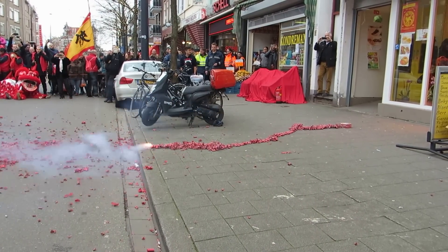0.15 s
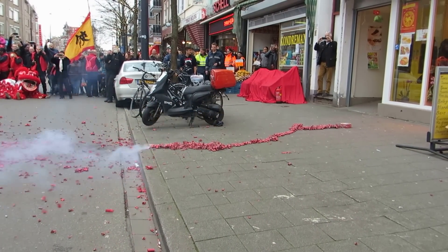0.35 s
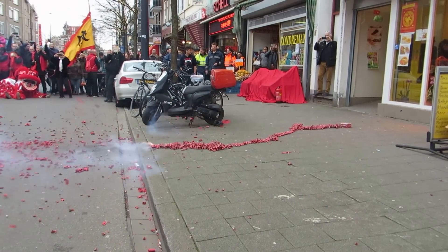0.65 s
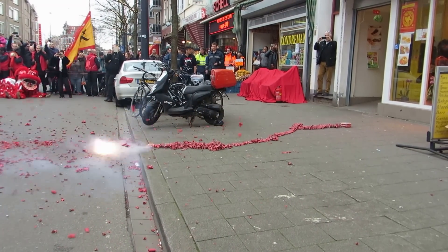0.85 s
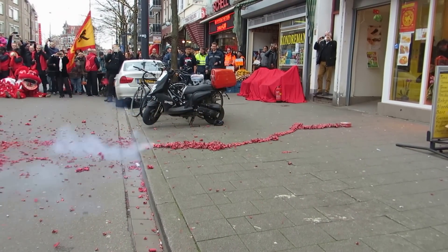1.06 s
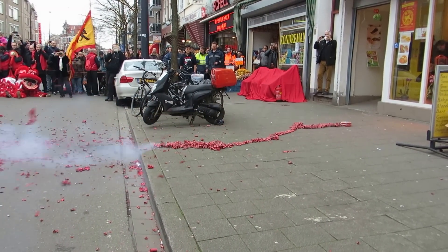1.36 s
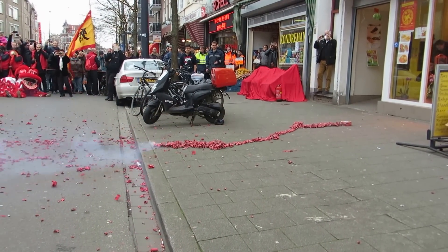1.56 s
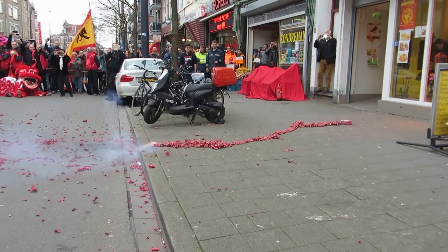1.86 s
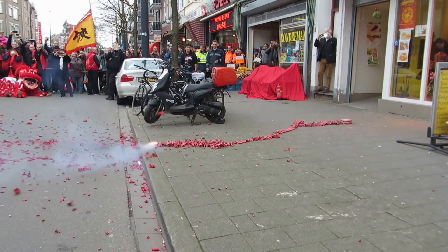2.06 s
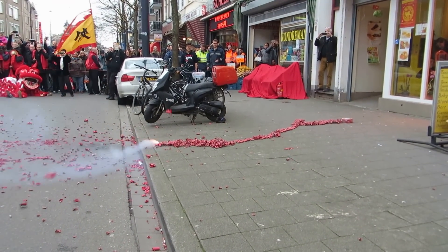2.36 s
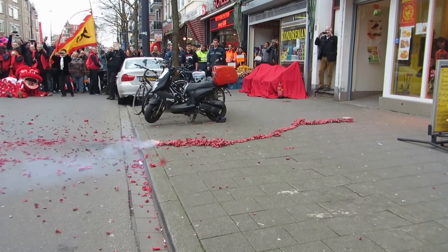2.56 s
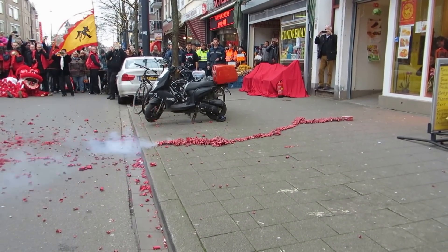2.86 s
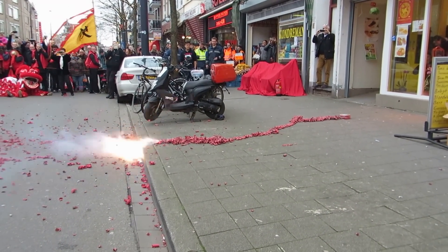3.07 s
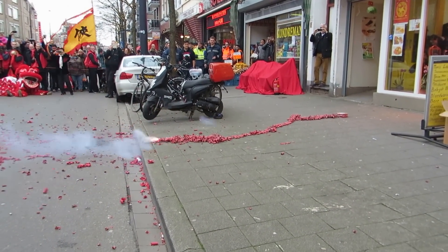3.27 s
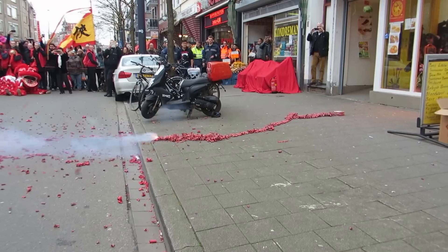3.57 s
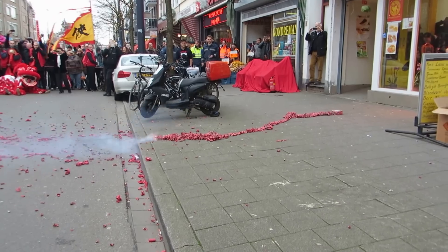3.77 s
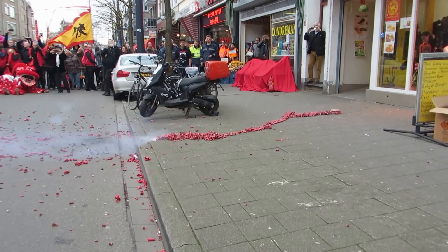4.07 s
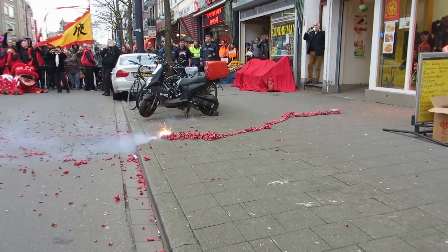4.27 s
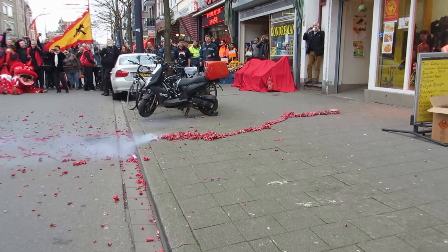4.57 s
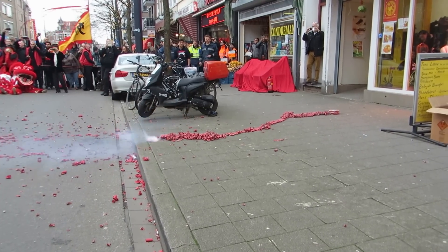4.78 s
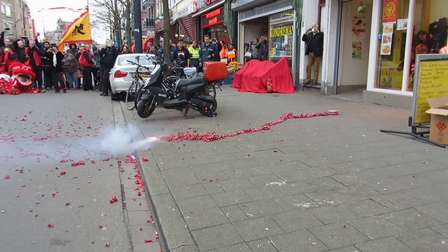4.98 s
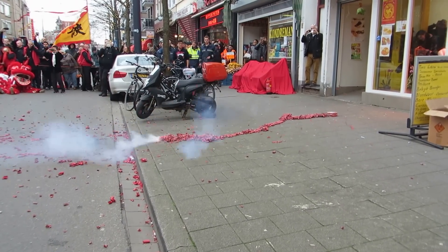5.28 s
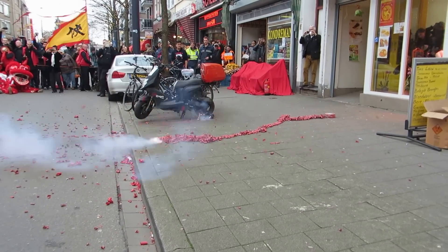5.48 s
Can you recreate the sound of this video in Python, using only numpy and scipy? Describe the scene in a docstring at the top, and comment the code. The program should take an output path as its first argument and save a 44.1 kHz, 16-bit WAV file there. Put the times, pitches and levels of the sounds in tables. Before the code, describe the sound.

Firecrackers go off close by in uneven clusters of harsh, distorted blasts that echo along a city street.

```python
"""Firecrackers on a city pavement, a few steps from a camera's stereo microphone.
An echo is already dying between the house fronts when the first cluster goes off. Each blast overloads
the microphone: a sharp crack, then a flat-topped roar that holds, falls in pitch and stops short.
Two early blasts jolt the capsules; from 1.5 s dull knocks fill a lull. More uneven clusters follow,
and after the last blast ends at 5.7 s no time is left for its echo. A faint street rumble lies under all."""
import sys
import numpy as np
from scipy import signal
from scipy.fft import rfft, irfft, next_fast_len
from scipy.io import wavfile
from scipy.ndimage import uniform_filter1d, map_coordinates

SR = 44100
rng = np.random.default_rng(int(sys.argv[2]) if len(sys.argv) > 2 else 0)


def to_wav(sig):
    """Store sig (one row per channel, or 1-D mono) as 16-bit WAV at the path in sys.argv[1].

    Samples outside -1..1 are clipped; the rate is SR.
    """
    pcm = np.clip(np.atleast_2d(sig), -1, 1) * 32767
    pcm = np.round(pcm).astype(np.int16)
    wavfile.write(sys.argv[1], SR, pcm.T)  # frames by channels


N = 248724

# the string, a few steps away: t/s, overload length/s, hold at full depth/s, top f/Hz, echo level/dB
BLASTS = [(.14, 0.2, 0.053, 2287, -19.5), (0.4774, 0.12, 0.081, 2450, -19.5),
          (0.6155, 0.057, 0.053, 2122, -29), (.675, 0.08, 0.064, 1948, -21), (.81, 0.086, .058, 2490, -24),
          (0.8939, 0.056, 0.044, 2258, -30), (.95, 0.055, 0.028, 2297, -40),
          (1.0066, 0.033, 0.0061, 1580, -30), (1.048, .124, .05, 2085, -24),
          (1.2067, 0.051, 0.035, 2424, -24), (1.259, 0.072, 0.054, 2254, -25),
          (1.88, .13, 0.048, 1989, -22), (2.016, 0.15, .05, 2041, -24), (2.4813, .075, .04, 1727, -28.5),
          (2.682, 0.094, 0.049, 1977, -25.5), (2.865, 0.21, 0.063, 2400, -18),
          (3.16, 0.14, 0.058, 2127, -25.5), (3.295, 0.11, 0.067, 2273, -22), (3.862, .084, .032, 1973, -28),
          (3.9991, 0.13, .101, 2397, -18), (4.1992, 0.066, .057, 1998, -22),
          (4.266, 0.11, .025, 2490, -24.5), (4.366, 0.095, 0.034, 2210, -26),
          (4.9373, 0.099, 0.066, 2350, -17.5), (5.1148, 0.17, 0.059, 2206, -20),
          (5.4451, .093, 0.058, 2110, -24), (5.5465, 0.15, 0.081, 2635, -18)]
# single crackers that cut through a roar: t/s, decay of their push on the pitch/s
CRACKERS = [(0.195, 0.0037), (0.511, 0.0041), (0.7304, 0.0019), (1.316, 0.0015), (2.4906, 0.0034),
            (2.69, .0041), (3.3213, 0.0045), (3.369, .003), (4.1092, .001), (4.422, 0.0018),
            (4.9915, 0.0035)]
# the deeper the overload, the higher and louder the roar: pitch f/Hz, level/dB
ROAR_LEVEL = [(250, -24.5), (500, -21.5), (900, -14.5), (2000, -12)]
# a shallow overload comes and goes: pitch f/Hz, random swing/dB
ROAR_GAPS = [(500, 4), (900, 2.5), (1500, 0.74)]
# spectrum of the capsules breaking up: f/Hz, level/dB
BREAKUP_SPECTRUM = [(40, -10), (200, 0), (700, 5.5), (1500, -27), (4000, 3), (7500, 15.5), (11000, 7),
                    (16000, 7.5)]
def blasts(roar_db=-0.5, shock_db=-5.5, cracker_db=-10, fizz_db=-31, snap_db=12.5, snap_s=0.0047):
    """Each blast cracks, then roars and fizzes for as long as it overloads the microphone."""
    out = np.zeros((2, N))
    fizz = np.array([noise(BREAKUP_SPECTRUM, N + SR) for _ in range(2)])  # each capsule its own
    for s, length, hold, top_hz, _ in BLASTS:
        t = np.arange(int((length + 0.054) * SR)) / SR
        pitch = roar_pitch(s, length, hold, top_hz, t)
        gate = np.clip((length - t) / 0.003 + .5, 0, 1) * np.clip(t / 0.00044, 0, 1)
        gaps_db = along(ROAR_GAPS, pitch) * wobble(194, len(t))
        roar = amp(along(ROAR_LEVEL, pitch) + gaps_db) * overload_roar(pitch, knee=0.76)
        breakup_db = fizz_db + snap_db * np.exp(-t / snap_s)  # hardest in the first instant
        breakup = amp(breakup_db) * (pitch / 2000) ** 1.47 * fizz[:, round(s * SR):][:, :len(t)]
        add(out, s, amp(roar_db) * low_cut(gate * (roar + breakup), corner_hz=110))
        add(out, s, amp(shock_db) * shock_front(spread_s=.004, relax_s=.0002))
    for s, decay in CRACKERS:  # the stronger the cracker, the longer it drives the pitch
        strength = amp(cracker_db) * min(decay / 0.01, 1)
        add(out, s, strength * shock_front(spread_s=0.0014, relax_s=.0001))
    return out


def shock_front(spread_s, relax_s, mismatch=0.31, bounces=4):
    """A shock and its bounces off the pavement: steep steps that relax, unlike in each capsule."""
    t = np.arange(SR // 20) / SR
    delay = np.append(0, rng.uniform(0, spread_s, bounces))[:, None]
    fronts = (t >= delay) * np.exp(-np.maximum(t - delay, 0) / relax_s)
    sizes = (-1) ** np.arange(bounces + 1) * (1 + mismatch * rng.standard_normal((2, bounces + 1)))
    return low_cut(np.tanh(2 * sizes @ fronts), corner_hz=800)


# the roar sputters more the lower it gets: pitch f/Hz, random swing/share of the pitch
ROAR_SPUTTER = [(500, .17), (2000, .1)]
def roar_pitch(s, length, hold, top_hz, t, onset_s=.006, fall_s=.026, growl_hz=520, cracker_hz=2907):
    """The pitch climbs, holds and sinks towards a growl as the overload eases."""
    onset = np.exp(-t / onset_s)
    letting_go = np.exp(-np.maximum(length - t, 0) / .06)
    pitch = growl_hz + (top_hz - growl_hz) * np.exp(-np.maximum(t - hold, 0) / fall_s)
    pitch *= (1 - .2 * onset) * (1 - .37 * letting_go)
    swing = along(ROAR_SPUTTER, pitch) + .35 * onset  # wildest while it climbs
    pitch *= np.exp(swing * wobble(200, len(t)))
    for when, decay in CRACKERS:  # a fresh cracker drives the pitch up again for a moment
        age = s + t - when
        pitch += (age > 0) * np.exp(-np.abs(age) / decay) * np.maximum(cracker_hz - pitch, 0)
    return pitch


# spectrum of the roar: f/pitch, level/dB
ROAR_SPECTRUM = [(.02, -52), (.1, -21.5), (.25, -18), (.5, -3), (.8, -0.5), (1, 0.5), (1.3, -2), (2, -7.5),
                 (4, -20.5), (8, -35.5), (14, -34.5), (20, -110)]
def overload_roar(pitch, knee, cycle_samples=32):
    """The saturated microphone: flat-topped noise whose whole spectrum slides with the pitch."""
    position = np.cumsum(pitch) / SR * cycle_samples
    n = next_fast_len(int(position[-1]) + SR // 10)
    band = noise([(ratio * SR / cycle_samples, db) for ratio, db in ROAR_SPECTRUM], n)
    envelope = np.abs(signal.hilbert(band))
    flat = unit(band / np.sqrt(envelope ** 2 + knee ** 2))  # saturation evens out the swings
    return map_coordinates(flat, [position + SR // 20], mode="mirror")


# blasts that jolt the capsules: t/s, level/dB, direction/sign, decay/s
CAPSULE_JOLTS = [(0.6170, -14, -1, 0.0055), (0.6757, -18, 1, 0.012)]
# spectrum of the buffeting: f/Hz, level/dB
BUFFET_SPECTRUM = [(25, -8), (160, -2), (850, 2), (1700, -7), (5000, -11), (7000, -40)]
def jolts(buffet_db=-9, settle_s=0.035):
    """A low push and a short buffeting drive the two capsules in opposite directions."""
    side = np.zeros(N)
    t = np.arange(SR // 4) / SR
    for s, db, direction, decay in CAPSULE_JOLTS:
        push = np.sign(direction) * np.exp(-t / decay)
        buffet = amp(buffet_db) * noise(BUFFET_SPECTRUM, len(t)) * np.exp(-t / settle_s)
        add(side, s, amp(db) * (push + buffet) * (1 - np.exp(-t / 0.00052)))
    return np.array([side, -side])


def thumps(level_db=-24.5, rise_s=0.00093, decay_s=0.0082, clear_s=.01, sunk_s=.03):
    """The microphone settles with a soft thump if a roar has sunk low and ends before the next blast."""
    out = np.zeros(N)
    t = np.arange(SR // 10) / SR
    thump = amp(level_db) * np.exp(-t / decay_s) * (1 - np.exp(-t / rise_s))
    for (s, length, hold, *_), (following, *_) in zip(BLASTS, BLASTS[1:]):
        if following - (s + length) > clear_s and length - hold > sunk_s:
            add(out, s + length, thump)
    return out


# echo off the nearest shop fronts: f/Hz, level/dB
SHOP_SPECTRUM = [(60, -28), (300, 0), (900, 15), (3000, -2.5), (7000, -2.5), (11000, -15), (16000, -32)]
# echo off the house fronts down the street: f/Hz, level/dB
STREET_SPECTRUM = [(40, -12), (120, -20), (270, -8), (520, -9), (780, 0.5), (1250, -1), (2500, -4),
                   (4200, -7.5), (6500, -9.5), (10000, -15), (16000, -25)]
# how long the street rings: f/Hz, t60/s
STREET_DECAY = [(150, 1.68), (1000, 1.09), (4000, 0.91), (8000, 0.58), (15000, 0.29)]
def street_echo(earlier_s=-0.11, earlier_db=-22, near_db=8, flutter_db=0.04):
    """The nearest shop fronts answer each blast briefly, the whole street for longer."""
    feeds = [(earlier_s, earlier_db)] + [(s, echo_db) for s, *_, echo_db in BLASTS]
    near = amp(near_db) * echo(SHOP_SPECTRUM, [(500, 0.21), (12000, 0.28)], feeds, build_s=0.015)
    far = echo(STREET_SPECTRUM, STREET_DECAY, feeds, build_s=0.064)
    return (near + far) * amp(flutter_db * unit(wobble(25, N) + wobble(140, N)))


def echo(spectrum, decays, feeds, build_s):
    """Dense reflections build after each (t/s, level/dB) feed and die, each frequency at its own rate."""
    hz, t, bins = signal.stft(stereo_noise(spectrum), SR, nperseg=256)
    t60 = along(decays, hz)[:, None]
    power = np.zeros(bins.shape[1:])
    for s, db in feeds:
        age = np.maximum(t - s, 0)
        power += (amp(db - 60 * age / t60) * (1 - np.exp(-age / build_s))) ** 2
    return signal.istft(bins * np.sqrt(power), SR, nperseg=256)[1][:, :N]


def deafness(dip_db=-2):
    """Gain of the echo: the microphone hears less of the street while it is overloaded."""
    t = np.arange(N) / SR
    overloaded = np.any([(t > s) & (t < s + length) for s, length, *_ in BLASTS], axis=0)
    return amp(dip_db * uniform_filter1d(overloaded.astype(float), size=128))


# dull knocks in a lull: t/s, level/dB
LULL_KNOCKS = [(1.499, -38), (1.614, -40), (1.650, -37.5), (1.676, -30), (1.690, -30.5), (1.709, -31.5),
               (1.726, -42), (1.735, -43), (1.863, -32)]
# spectrum of a knock: f/Hz, level/dB
KNOCK_SPECTRUM = [(60, -14), (200, -5.5), (700, -7), (1500, -15), (5000, -66)]
def knocks(faint_db=-51, decay_s=0.0045, lag_s=0.00045, count=130):
    """A few clear knocks over a faint patter, off to the left: the right capsule hears them later."""
    out = np.zeros((2, N))
    t = np.arange(SR // 16) / SR
    patter = [(N / SR * rng.random(), faint_db + rng.normal(0, 1.8)) for _ in range(count)]
    envelope = (np.exp(-t / decay_s) + 0.3 * np.exp(-t / 0.028)) * (1 - np.exp(-t / 0.00023))
    for s, db in list(LULL_KNOCKS) + patter:
        knock = amp(db) * envelope * noise(KNOCK_SPECTRUM, len(t))
        add(out[0], s, knock)
        add(out[1], s + lag_s, knock)
    return out


# the street's own background: f/Hz, level/dB
RUMBLE_SPECTRUM = [(15, -37), (25, -8), (87, -2.5), (157, -0.5), (439, -30), (714, -14), (2050, -11),
                   (5730, -26), (9570, -35), (12500, -34), (16000, -58)]
def street_rumble(level_db=-54):
    """The faint, steady rumble of the city around the microphone."""
    return amp(level_db) * stereo_noise(RUMBLE_SPECTRUM)


# stereo width of the street: f/Hz, side level against mid/dB
STREET_WIDTH = [(100, -32), (400, -29), (700, -32), (1300, -27.5), (2400, -17), (4400, -10.5), (8000, -5),
                (15000, 10)]
def stereo_noise(spectrum):
    """Street noise at the two capsules: alike in the bass, wide in the treble."""
    mid = noise(spectrum, N)
    side = filtered(noise(spectrum, N), lambda hz: amp(along(STREET_WIDTH, hz)))
    return np.array([mid + side, mid - side])


def noise(spectrum, n):
    """Coloured noise of rms 1."""
    return unit(filtered(rng.standard_normal(n), lambda hz: amp(along(spectrum, hz))))


def wobble(rate, n):
    """A smooth random curve, rate knots a second."""
    knots = rng.standard_normal(int(n * rate / SR) + 4)
    return map_coordinates(knots, [np.arange(n) * rate / SR], mode="mirror")


def filtered(x, response):
    """x through a frequency response."""
    n = x.shape[-1]
    padded = next_fast_len(n + SR // 10)
    return irfft(rfft(x, padded) * response(np.fft.rfftfreq(padded, 1 / SR)), padded)[..., :n]


def low_cut(x, corner_hz):
    """One-pole high-pass."""
    return filtered(x, lambda hz: hz / (hz - 1j * corner_hz))


def along(points, hz):
    """Read (f/Hz, value) points on a log axis."""
    freqs, values = np.transpose(points)
    return np.interp(np.log(hz + 1e-9), np.log(freqs), values)


def amp(db):
    """Decibels to gain."""
    return 10 ** (np.asarray(db) / 20)


def unit(x):
    """Scale to rms 1."""
    return x / np.sqrt(np.mean(np.abs(x) ** 2) + 1e-20)


def add(track, s, x):
    """Mix x into the track at time s."""
    start = max(round(s * SR), 0)
    span = track[..., start:start + x.shape[-1]]
    span += x[..., :span.shape[-1]]


def scene():
    """From the pavement: blasts close by, the street's echo behind, knocks and rumble underneath."""
    return blasts() + thumps() + jolts() + deafness() * street_echo() + knocks() + street_rumble()


def record(dry, ceiling=.64, hardness=5, bass_hz=30, treble_hz=13000, limit_hz=15900):
    """The camera rounds off the peaks, thins deep bass and top treble, and stops at its band limit."""
    def response(hz):
        band_edge = np.clip((limit_hz - hz) / 300 + .5, 0, 1)
        treble_rolloff = 1 / np.sqrt(1 + (hz / treble_hz) ** 4)
        return band_edge * treble_rolloff * hz / (hz - 1j * bass_hz)
    clipped = dry / (1 + np.abs(dry / ceiling) ** hardness) ** (1 / hardness)
    return filtered(clipped, response)


dry = scene()
out = record(dry)
to_wav(out)
```